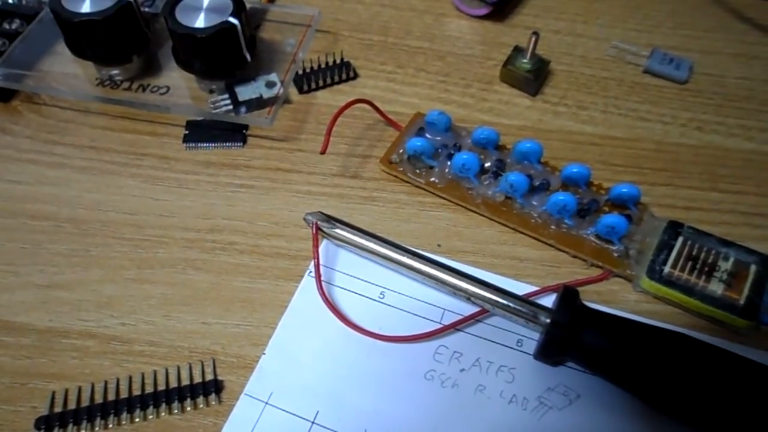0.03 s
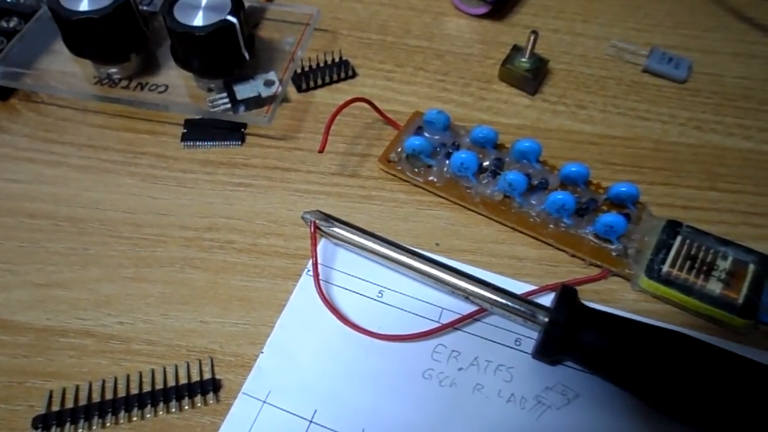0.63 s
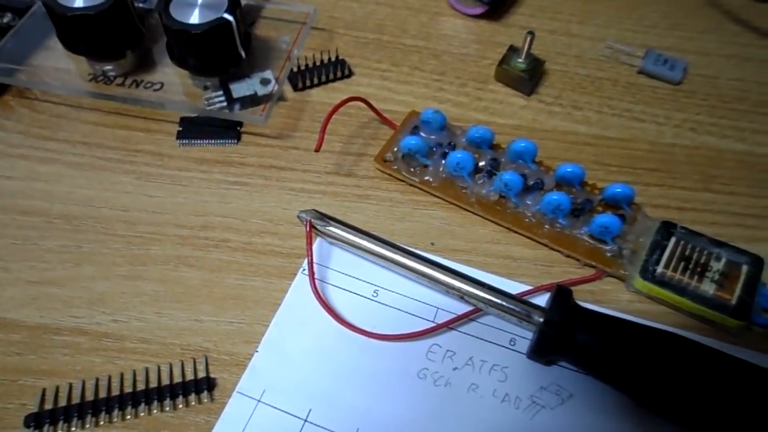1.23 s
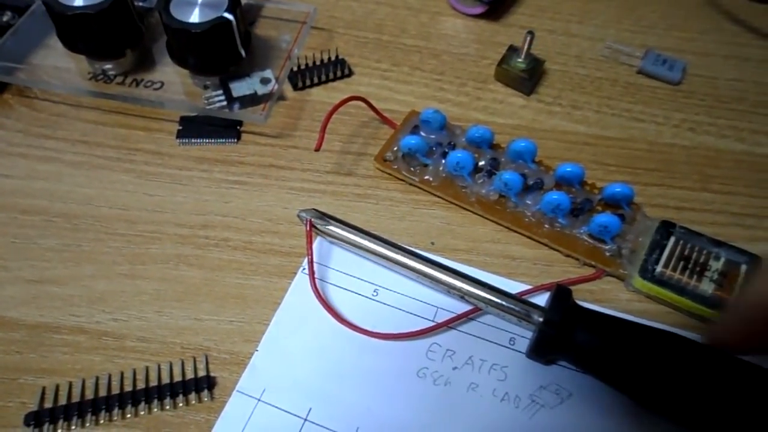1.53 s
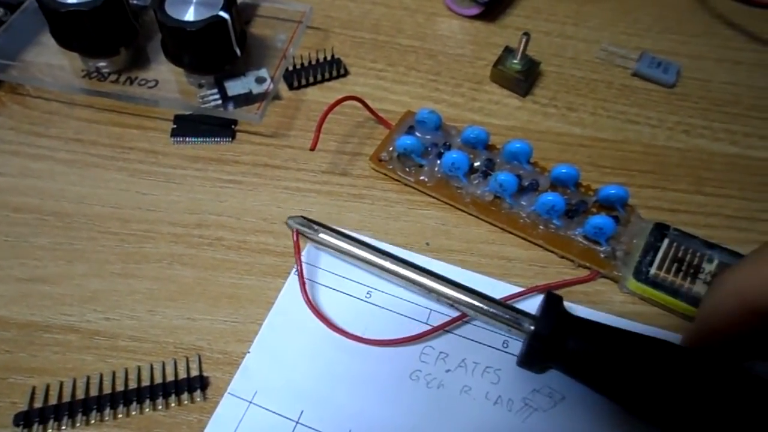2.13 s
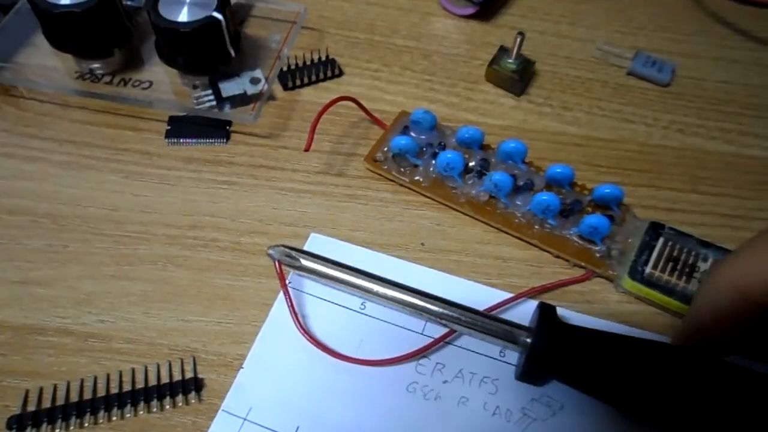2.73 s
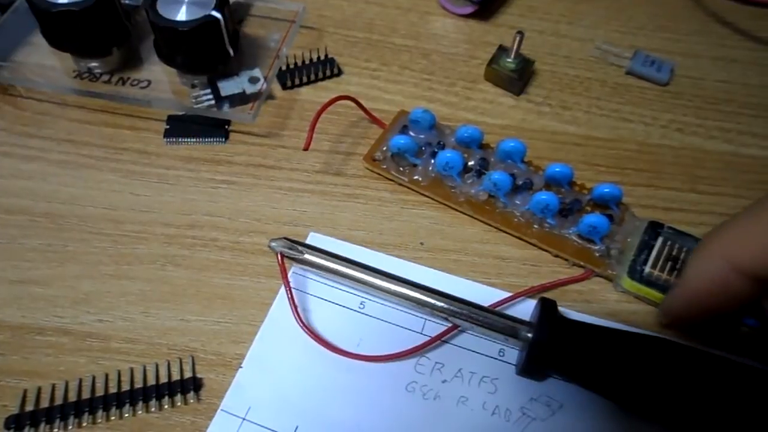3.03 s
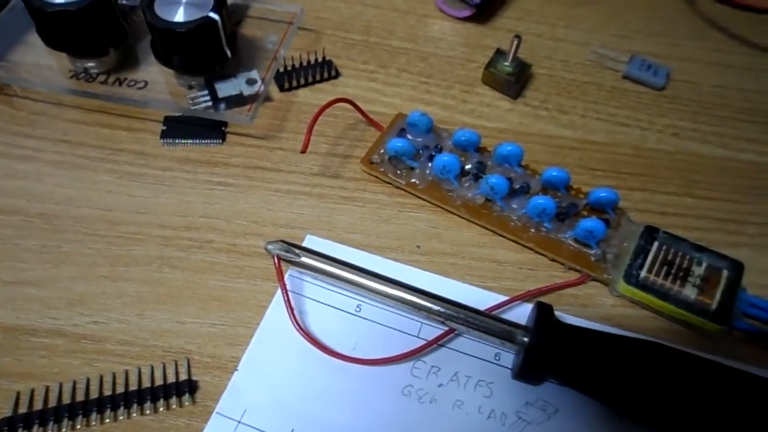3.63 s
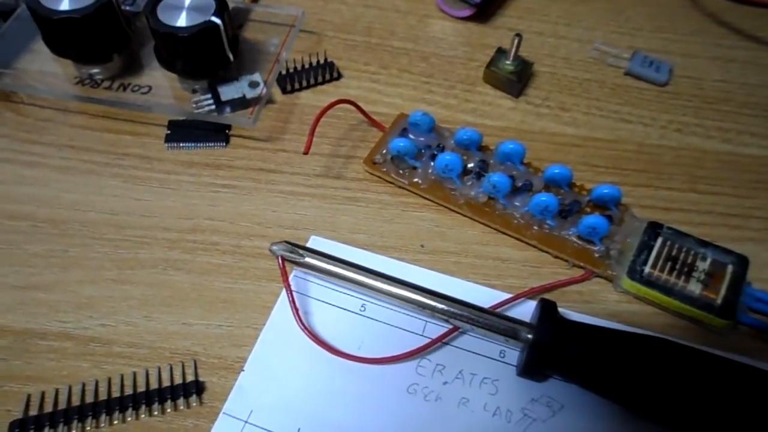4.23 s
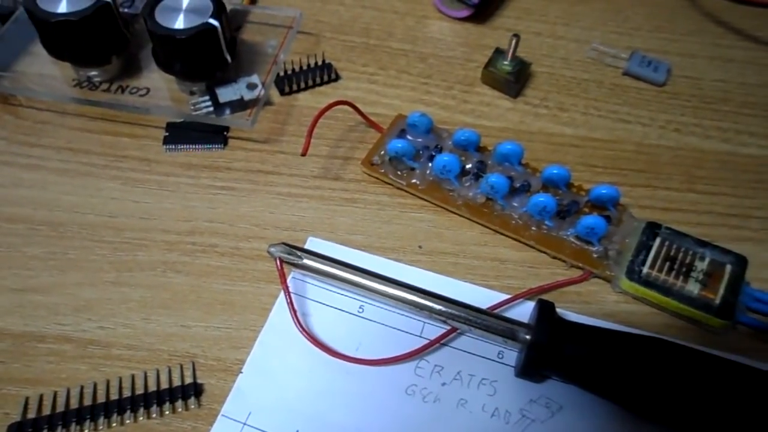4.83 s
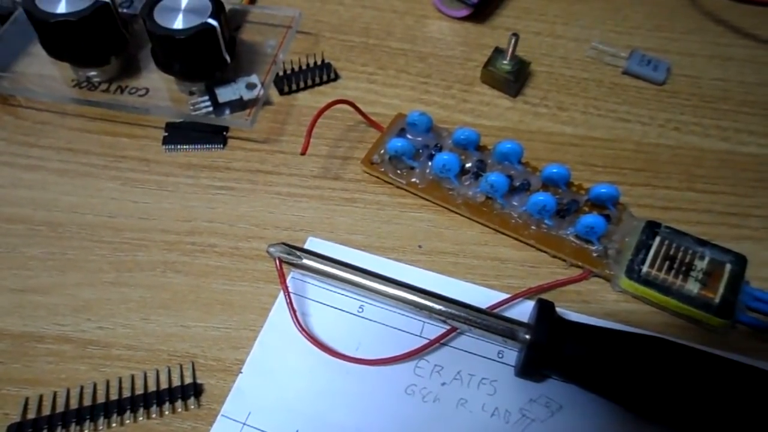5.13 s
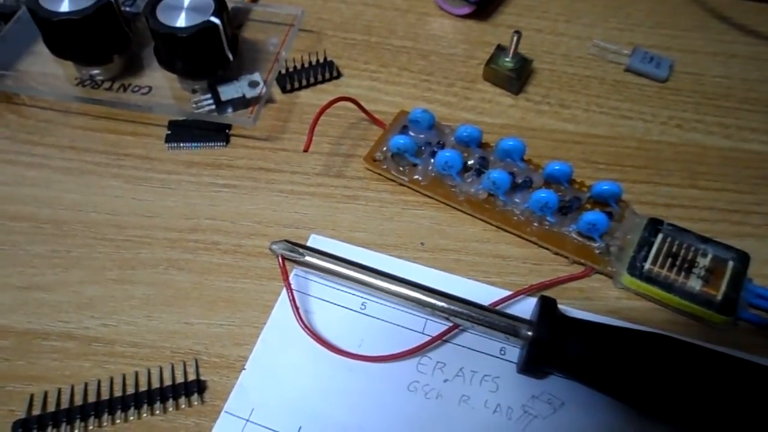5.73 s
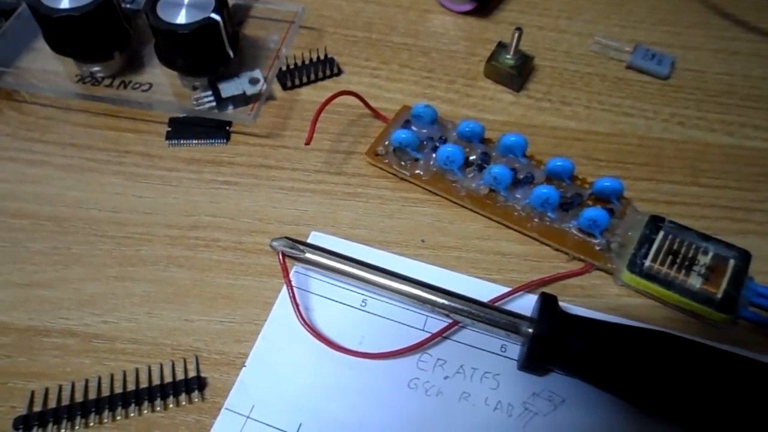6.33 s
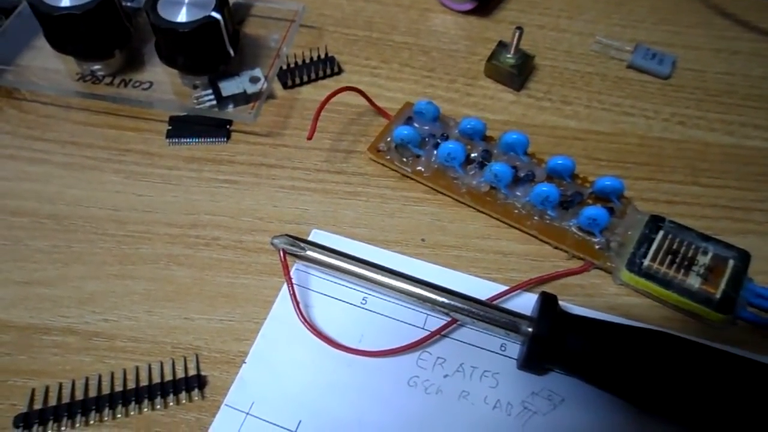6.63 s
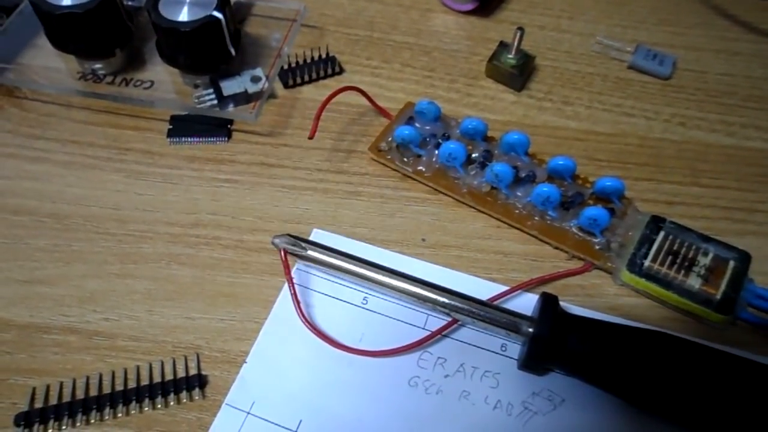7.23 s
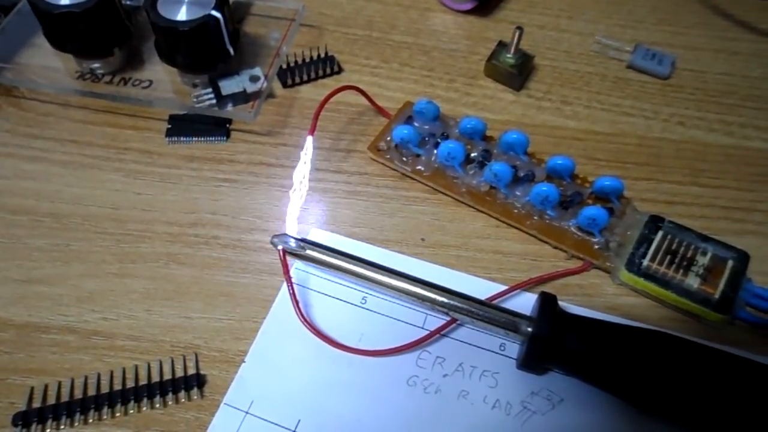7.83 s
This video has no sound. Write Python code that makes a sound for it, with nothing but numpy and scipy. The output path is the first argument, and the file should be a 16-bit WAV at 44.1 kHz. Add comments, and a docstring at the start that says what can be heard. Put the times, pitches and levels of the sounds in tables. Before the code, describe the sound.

A loud, thin electric zap from a homemade high-voltage device opens the sound, lasting about a tenth of a second. A quiet fan and mains hum creeps up behind it and continues throughout. Around 0.8 seconds, small parts click, scrape and faintly squeak as they are shifted. The wooden bench gives soft thuds at about 1.7 and 3 seconds, and a light click comes at 4. At 6.7 seconds a faint hiss builds into one hard spark snap just before 6.9. Another snap at 7.1 starts a loud, crackling buzz of rapid sparks until 7.3. After a short gap, a second, longer run buzzes from 7.7 to about 8.1 seconds. The sparks are bright and harsh with a slight low rumble beneath, and the background dips after them. Everything is close and mono, in a small room.

```python
"""Sparks from a voltage multiplier

A home-made multiplier on a wooden bench throws sparks from a wire to a screwdriver, near a mono camera.
Corona hisses at the wire until the air breaks down with a hard snap; repeated charge and discharge
makes buzzing runs of hundreds of sparks a second. Between runs a fan hums and hands shift the parts.
The camera's gain control ducks at each run and creeps back."""
import sys
import numpy as np
from scipy import signal
from scipy.fft import rfft, irfft
from scipy.io import wavfile
from scipy.ndimage import uniform_filter1d

SR = 44100
rng = np.random.default_rng(int(sys.argv[2]) if len(sys.argv) > 2 else 0)


def store_wav(level_fs):
    """Save 16-bit WAV to argv[1]."""
    pcm = np.round(np.clip(np.atleast_2d(level_fs), -1, 1) * 32767)
    wavfile.write(sys.argv[1], SR, pcm.T.astype(np.int16))


N = 357210
TIME = np.arange(N) / SR
EVENT_TIME = np.arange(SR // 2) / SR


def amp(db):
    """Amplitude ratio of a level in decibels."""
    return 10 ** (np.asarray(db) / 20)


def unit_rms(x):
    """Normalisation to an rms of 1."""
    return x / np.sqrt(np.mean(x ** 2) + 1e-20)


def curve_at(points, hz):
    """Interpolation of (frequency_hz, value) points on a log-frequency axis."""
    point_hz, value = np.transpose(points)
    return np.interp(np.log(hz + 1), np.log(point_hz + 1), value)


def bins(size):
    """Frequencies of the Fourier transform of this many samples."""
    return np.fft.rfftfreq(size, 1 / SR)


def coloured(x, points):
    """Zero-phase filtering by a (frequency_hz, gain_db) curve."""
    return irfft(rfft(x) * amp(curve_at(points, bins(len(x)))), len(x))


def add(mix, start_s, sound):
    """Superposition of a sound on the mix."""
    part = mix[max(round(start_s * SR), 0):][:len(sound)]
    part += sound[:len(part)]


def band_noise(centre_hz, octaves, size=len(EVENT_TIME)):
    """Noise of rms 1 in a Gaussian band."""
    bell = np.exp(-.5 * (np.log2((bins(size) + 1) / centre_hz) / octaves) ** 2)
    return unit_rms(irfft(rfft(rng.standard_normal(size)) * bell, size))


def wandering_phase(t, pitch_hz, width_hz, smooth_samples):
    """Phase diffusion: a random walk broadens a tone's spectral line."""
    drift = np.cumsum(rng.standard_normal(len(t))) * np.sqrt(2 * np.pi * width_hz / SR)
    return 2 * np.pi * pitch_hz * t + uniform_filter1d(drift, size=smooth_samples)


# spectrum of fan, room and microphone noise: frequency_hz, gain_db
AIR_SPECTRUM = [(12, -21), (22, 1), (55, -3.5), (100, -6.5), (160, -10.5), (230, -11), (440, -12),
                (900, -14.5), (1950, -15), (3000, -22.5), (5000, -29), (10000, -34.5), (14000, -35.5),
                (15700, -31.5)]
# mains hum and fan tones: pitch_hz, level_db, width_hz
HUM_TONES = [(58.2, -73, 1), (113.1, -76.5, 8), (155.2, -79, 5), (226.2, -84.5, 6), (449.5, -83.5, 5),
             (898, -82, 4), (1084, -78.5, 120), (1617, -80, 60), (1783, -78.5, 5), (1806, -87, 120)]

def fan(air_db=-65.08):
    """Broadband noise plus line spectrum: rushing air, wavering blade tones and mains hum."""
    air = amp(air_db) * unit_rms(coloured(rng.standard_normal(N), AIR_SPECTRUM))
    for pitch_hz, level_db, width_hz in HUM_TONES:
        air += amp(level_db) * np.sqrt(2) * np.sin(wandering_phase(TIME, pitch_hz, width_hz, 100))
    return air


# parts being handled: start_s, level_db, centre_hz, width_octaves, t60_s
PART_CLICKS = [(.752, -48.5, 3330, 1.8, 0.22), (.8075, -42, 2700, 0.87, 0.033),
               (.969, -62, 3400, .6, 0.033), (4.054, -54, 3240, 0.71, 0.066),
               (6.572, -63, 13500, .3, 0.034)]

def part_clicks(rise_s=.0018):
    """Impact: each knock is a noise burst with a fast rise and an exponential decay."""
    out, t = np.zeros(N), EVENT_TIME
    for start_s, level_db, centre_hz, octaves, t60_s in PART_CLICKS:
        envelope = (1 - np.exp(-t / rise_s)) * amp(level_db - 60 * t / t60_s)
        add(out, start_s, envelope * band_noise(centre_hz, octaves))
    return out


# a part sliding over the bench: start_s, length_s, level_db, centre_hz
PART_SCUFFS = [(0.817, 0.091, -57.5, 3040), (0.894, 0.16, -68, 2640)]

def scuffs(fade_db=-2.5):
    """Sliding friction: a band of noise that fades as the part slows."""
    out = np.zeros(N)
    for start_s, length_s, level_db, centre_hz in PART_SCUFFS:
        t = EVENT_TIME[EVENT_TIME < length_s]
        stroke = signal.windows.tukey(len(t), .23) * amp(level_db + fade_db * t / length_s)
        add(out, start_s, stroke * band_noise(centre_hz, octaves=.7)[:len(t)])
    return out


# modes of the bench top: pitch_hz, gain_db, t60_s
BENCH_MODES = [(115, -8.5, .07), (161, -5, 0.11), (239, -2.5, 0.051), (338, -5.5, .035), (460, -3, 0.053),
               (620, -2.5, 0.018), (794, -6, 0.042)]
# nudges on the bench: start_s, gain_db, cutoff_hz
BENCH_NUDGES = [(1.721, -45.5, 900), (2.946, -48, 170), (2.966, -54, 200)]

def bench_thuds():
    """Modal vibration: a nudge rings the damped modes, and a softer touch excites fewer high ones."""
    out, t = np.zeros(N), EVENT_TIME
    ring = sum((-1) ** k * amp(gain_db - 60 * t / t60_s) * np.sin(2 * np.pi * pitch_hz * t)
               for k, (pitch_hz, gain_db, t60_s) in enumerate(BENCH_MODES))
    for start_s, gain_db, cutoff_hz in BENCH_NUDGES:
        touch = signal.butter(4, cutoff_hz, fs=SR, output="sos")
        add(out, start_s, amp(gain_db) * signal.sosfilt(touch, ring))
    return out


# parts rubbing: start_s, length_s, pitch_hz, level_db
PART_SQUEAKS = [(.752, 0.058, 5640, -57.5), (.792, .045, 5720, -66), (.86, 0.087, 6760, -80),
                (1.168, 0.052, 5150, -78), (4.636, .06, 5030, -79)]

def squeaks(width_hz=56):
    """Friction-excited vibration: a faint, wavering high tone with a weak second harmonic."""
    out = np.zeros(N)
    for start_s, length_s, pitch_hz, level_db in PART_SQUEAKS:
        phase = wandering_phase(EVENT_TIME, pitch_hz, width_hz, 60)[EVENT_TIME < length_s]
        tone = np.sqrt(2) * (np.sin(phase) + .16 * np.sin(2 * phase))
        add(out, start_s, amp(level_db) * tone * signal.windows.tukey(len(tone), .5))
    return out


# spectrum of the rumble under the sparks: frequency_hz, gain_db
RUMBLE_SPECTRUM = [(8, -0.5), (25, -4.5), (60, -11.5), (110, -19), (250, -43.5), (1000, -81)]

def rumble(level_db=-50.5, fade_s=.1):
    """Gated low-frequency noise: it lasts through each run of sparks, then decays exponentially."""
    envelope = sum((TIME > start_s) * np.exp(-np.maximum(TIME - end_s, 0) / fade_s)
                   for start_s, end_s, *_ in SPARK_RUNS)
    return amp(level_db) * envelope * unit_rms(coloured(rng.standard_normal(N), RUMBLE_SPECTRUM))


# single reflections from nearby things: delay_s, pressure_ratio
REFLECTIONS = [(.00049, -0.033), (.0013, 0.044), (.00202, 0.024), (.00809, 0.078)]
# spectrum of the reverberation: frequency_hz, gain_db
ROOM_SPECTRUM = [(100, -3.5), (500, -11.5), (1700, -4.5), (2400, -4), (5500, 2.5), (8000, 5), (11000, -1),
                 (15000, -1)]

def room_response():
    """Multipath propagation: direct sound, early reflections and three diffuse tails."""
    t = EVENT_TIME
    paths = np.zeros(len(t))
    for delay_s, pressure_ratio in [(.0002, 1)] + REFLECTIONS:
        paths[round(delay_s * SR)] += pressure_ratio
    bench_s, wall_s = REFLECTIONS[0][0], REFLECTIONS[-1][0]
    # scatter off the bench, splash off the nearest wall, decay of the small room
    for delay_s, energy_db, t60_s in [(bench_s, -8, .028), (wall_s, -14, .023), (wall_s, -10, .19)]:
        decay = (t > delay_s) * amp(-60 * np.maximum(t - delay_s, 0) / t60_s)
        tail = decay * coloured(rng.choice([-1., 1.], len(t)), ROOM_SPECTRUM)
        paths += amp(energy_db) * unit_rms(tail) / np.sqrt(len(t))
    return paths


# spectrum of one spark at the microphone: frequency_hz, gain_db
SPARK_SPECTRUM = [(8, -20.5), (30, -25), (110, -27.5), (260, -27.5), (500, -26), (2000, -26), (3600, -24.5),
                  (5800, -24.5), (7900, -27), (9000, -24.5), (11000, -23), (13000, -15.5), (15500, -15.5),
                  (17500, -20)]
# resonances and notches of bench clutter and microphone port: centre_hz, width_hz, gain_db
RESONANCES = [(1237, 300, 3.5), (2330, 400, 6), (2670, 23, 2), (2903, 400, 7), (3550, 200, 2),
              (3910, 400, 4.5), (4620, 270, 5.5), (4980, 200, 3.5), (5780, 130, -3), (6370, 510, 4),
              (7130, 400, 6), (8300, 260, 3), (8750, 160, 1.5), (10400, 900, 4), (11150, 170, 4),
              (12550, 200, -7), (14400, 160, 4)]

def spark_pulse(size=8192):
    """Minimum-phase response: one spark's pressure pulse and the short ring of things around it."""
    hz = bins(size)
    resonance_db = sum(gain_db * np.exp(-np.log(2) * (2 * (hz - centre_hz) / width_hz) ** 2)
                       for centre_hz, width_hz, gain_db in RESONANCES)
    db = curve_at(SPARK_SPECTRUM, hz) + resonance_db
    log_gain = np.log(amp(np.r_[db, db[-2:0:-1]]))
    spectrum = np.exp(np.conj(signal.hilbert(log_gain)))  # causal: nothing before the crack
    return -np.fft.ifft(spectrum).real[:size // 2]


# the wire hissing before each snap: start_s, end_s, level_db
CORONA_SPELLS = [(6.68, 6.847, -62), (7.046, 7.07, -55.5)]

def corona(pulse, rate_hz=5000, spread_db=6):
    """Corona discharge: thousands of tiny pulses leak from the wire's tip while the voltage builds."""
    sizes = amp(spread_db * np.minimum(rng.exponential(1, N), 4)) * rng.choice([-1., 1.], N)
    leaks = sizes * (rng.random(N) < rate_hz / SR)
    hiss = unit_rms(signal.oaconvolve(leaks, pulse)[:N])
    return hiss * sum(amp(db) * ((TIME > start_s) & (TIME < end_s)) for start_s, end_s, db in CORONA_SPELLS)


def impulses(events):
    """Sinc interpolation: a band-limited impulse for each (start_s, strength_db), between samples."""
    out, taps = np.zeros(N), np.arange(-8, 9)
    for start_s, strength_db in events:
        whole, fraction = divmod(start_s * SR, 1)
        impulse = np.sinc(taps - fraction) * np.hanning(len(taps))
        add(out, (whole + taps[0]) / SR, amp(strength_db) * impulse)
    return out


def firings(start_s, end_s, rate_hz, strength_db, growth_db, swell, jitter, misfire_chance):
    """Relaxation oscillation: recharging to a higher firing voltage takes longer and sparks louder."""
    memory, misfire_periods, spread_db, max_sparks = .2, .55, .5, 200
    now_s, stray, fired = start_s, 0, []
    for (kick, size), luck in zip(rng.standard_normal((max_sparks, 2)), rng.random(max_sparks)):
        progress = (now_s - start_s) / (end_s - start_s)
        stray = memory * stray + jitter * kick  # part of each deviation carries over to the next spark
        voltage_ratio = np.exp(stray + swell * np.sin(np.pi * progress))
        if fired:
            now_s += (voltage_ratio + misfire_periods * (luck < misfire_chance)) / rate_hz
        if now_s > end_s:
            break
        spark_db = strength_db + growth_db * progress + 20 * np.log10(voltage_ratio) + spread_db * size
        fired.append((now_s, spark_db))
    return fired


# runs of sparks; swell is the mid-run rise of the firing voltage, jitter its random spread:
# start_s, end_s, rate_hz, strength_db, growth_db, swell_ratio, jitter_ratio, misfire_chance
SPARK_RUNS = [(.001, 0.085, 680, 20.5, 3, .16, .085, 0.03), (7.08, 7.342, 271, 20, 3, .02, 0.096, .12),
              (7.688, 8.102, 269, 25.5, 3.5, 0.0392, .105, 0.05)]
# thin, piercing colour of a short gap: frequency_hz, gain_db
SHORT_GAP_COLOUR = [(30, -11), (600, -3.5), (3000, -4.5), (5000, -3.5), (6800, -6.5), (9500, 1),
                    (11500, -0.5), (13500, -2), (16000, -6)]
# first breakdowns of cold air, at full charge: start_s, strength_db
COLD_SNAPS = [(6.8553, 26), (7.0733, 23)]
# colour of their thick channel, with more body and less top: frequency_hz, gain_db
SNAP_COLOUR = [(200, 0.5), (1700, 0), (3000, -0.5), (8000, 0.5), (12000, -3), (16000, -2)]

def sparks(pulse):
    """Dielectric breakdown: the first run jumps a short gap, the snaps and later runs a long one."""
    first, second, third = (impulses(firings(*run)) for run in SPARK_RUNS)
    snaps = coloured(impulses(COLD_SNAPS), SNAP_COLOUR)
    train = coloured(first, SHORT_GAP_COLOUR) + snaps + second + third
    return signal.oaconvolve(train, pulse)[:N]


def scene():
    """Superposition: sparks and corona share one path to the microphone, over the background sounds."""
    pulse = spark_pulse()
    discharge = signal.oaconvolve(sparks(pulse) + corona(pulse), room_response())[:N]
    mono = discharge + fan() + part_clicks() + scuffs() + bench_thuds() + squeaks() + rumble()
    return np.array([mono, mono])


def gain_control(x, limit_db=-29, attack_share=.23, hold_s=.33, release_s=.38, margin_db=5, size=176):
    """Automatic gain control: each loud block pulls the gain down; it is held, then creeps back."""
    blocks = x[:N // size * size].reshape(-1, size)
    heard_db = 10 * np.log10(blocks.std(1) * abs(blocks).max(1) + 1e-14)  # halfway between rms and peak
    cut_db, held_s, cuts_db = max(heard_db[0] - limit_db, 0), 0, []
    for level_db in heard_db:
        cuts_db.append(cut_db)
        over_db = level_db - cut_db - limit_db
        held_s = 0 if over_db > -margin_db else held_s + size / SR
        cut_db += attack_share * max(over_db, 0)
        if held_s > hold_s:
            cut_db *= np.exp(-size / SR / release_s)
    block_centres = (np.arange(len(cuts_db)) + .5) * size
    return amp(-np.interp(np.arange(N), block_centres, cuts_db))


# bass-heavy noise of the camera's electronics: frequency_hz, gain_db
SELF_NOISE_SPECTRUM = [(20, 41), (60, 28.5), (150, 17.5), (500, 5), (2000, 3), (16000, -0.5)]

def record(dry, noise_gain_db=-91, ceiling=.24, cutoff_hz=15900):
    """The camera's signal chain: gain control, self-noise, clipping on overload, then a band limit."""
    self_noise = amp(noise_gain_db) * coloured(rng.standard_normal(N), SELF_NOISE_SPECTRUM)
    clipped = np.clip(dry * gain_control(dry[0]) + self_noise, -ceiling, ceiling)
    lowpass = signal.firwin(511, cutoff_hz, window=("kaiser", 9), fs=SR)
    return signal.oaconvolve(clipped, lowpass[None], "same")


dry = scene()
out = record(dry)
store_wav(out)
```